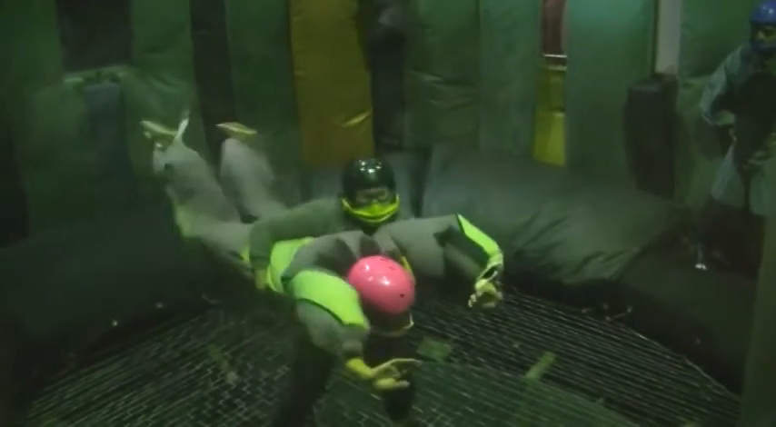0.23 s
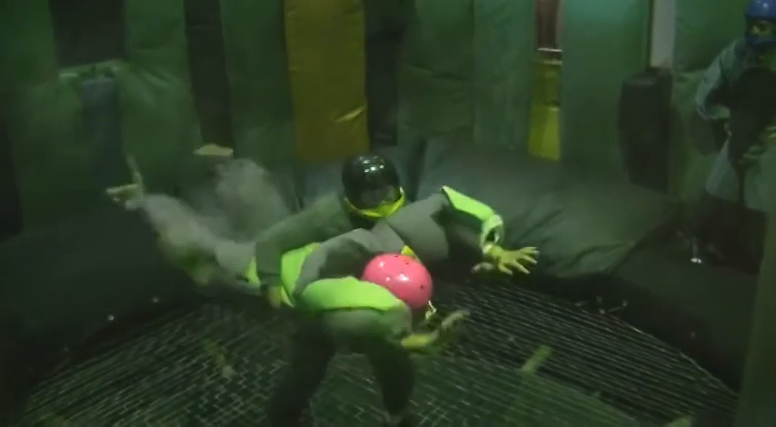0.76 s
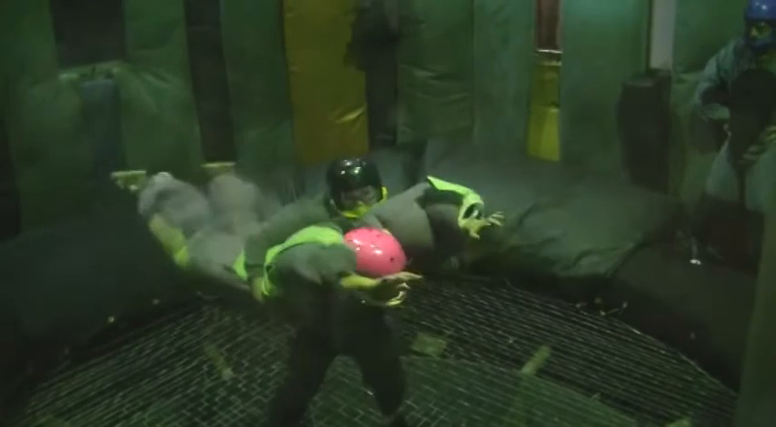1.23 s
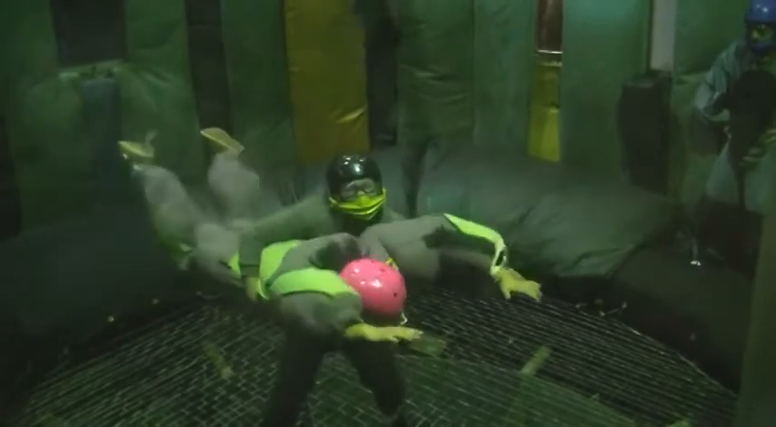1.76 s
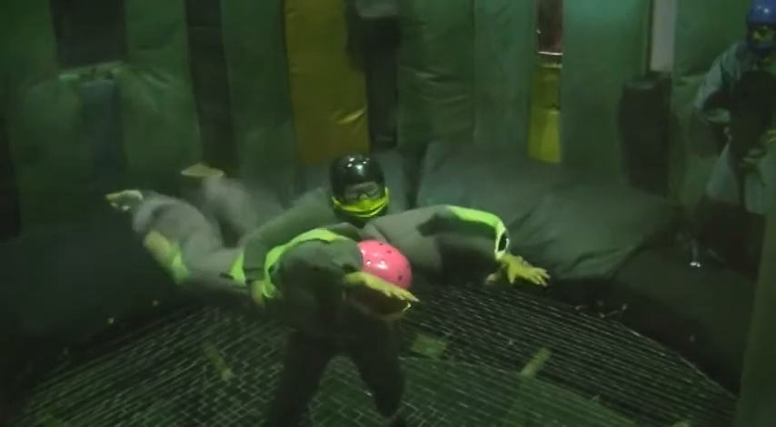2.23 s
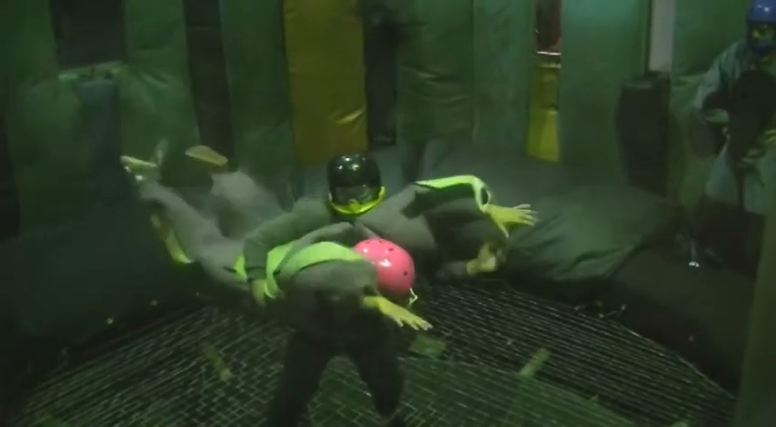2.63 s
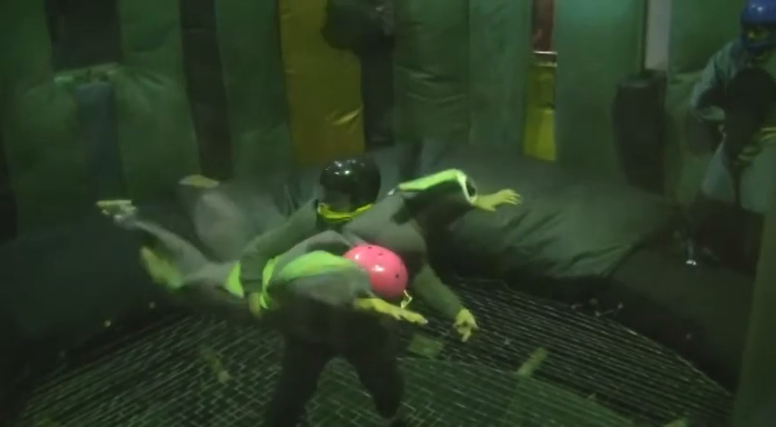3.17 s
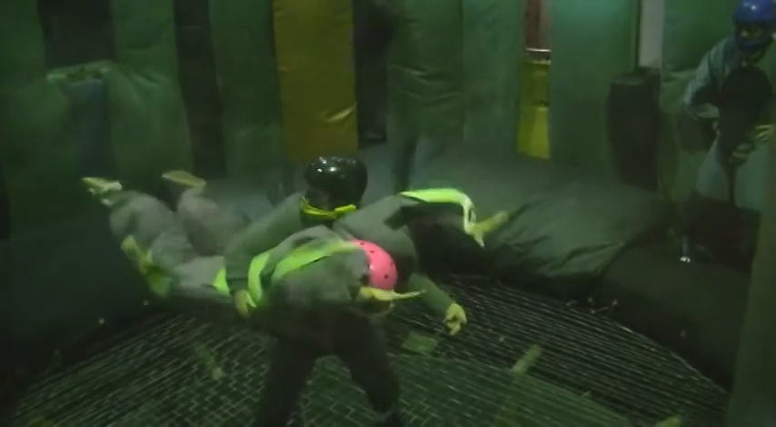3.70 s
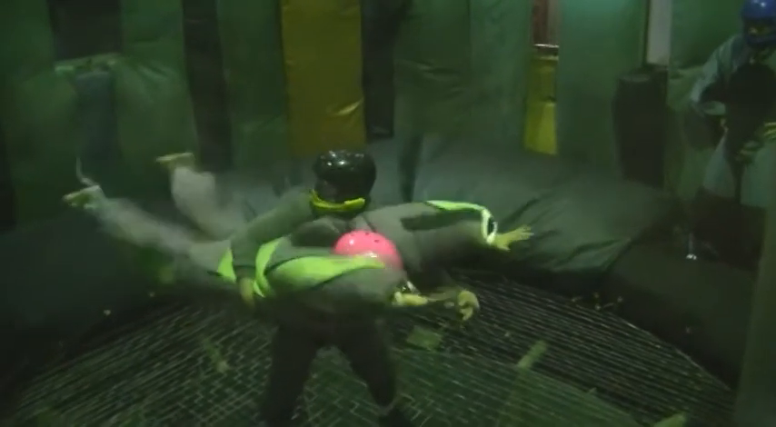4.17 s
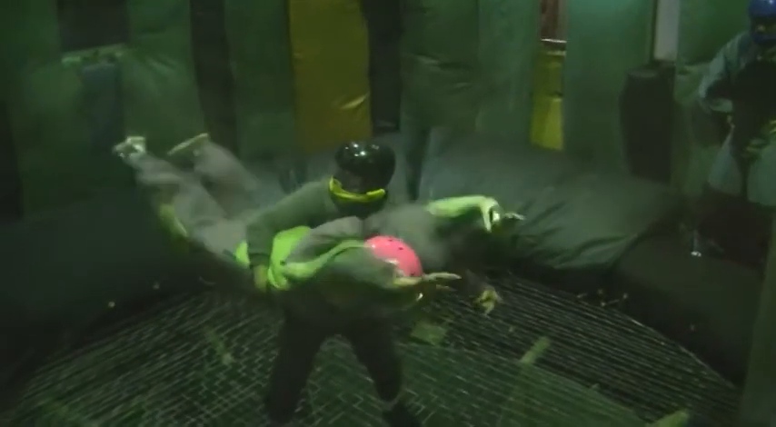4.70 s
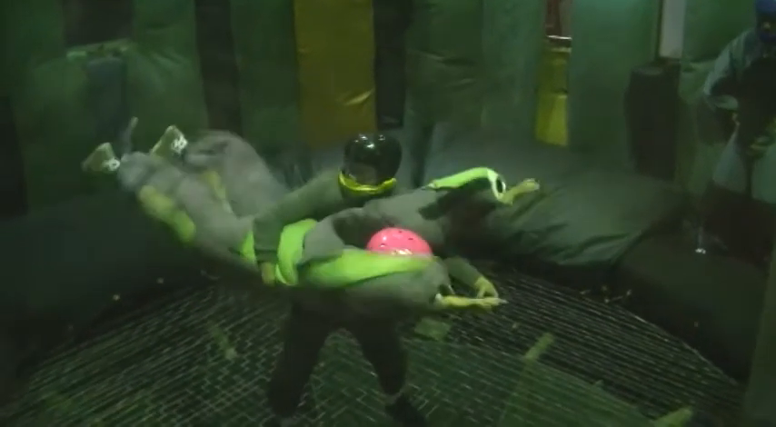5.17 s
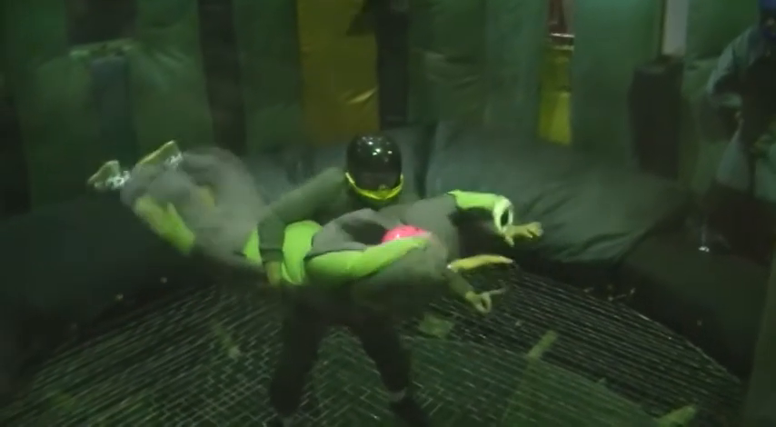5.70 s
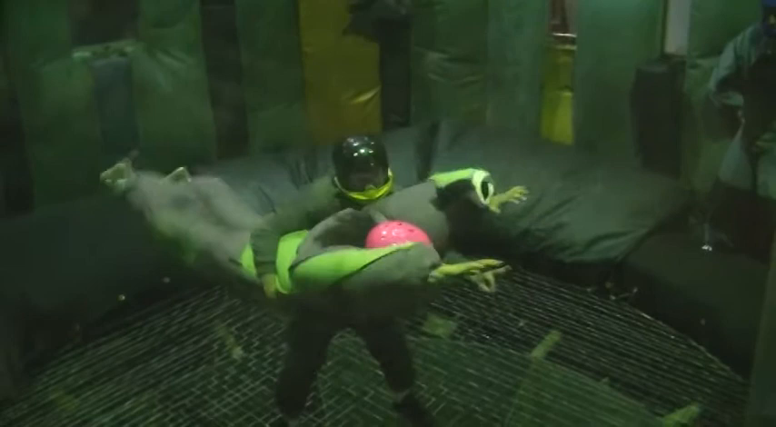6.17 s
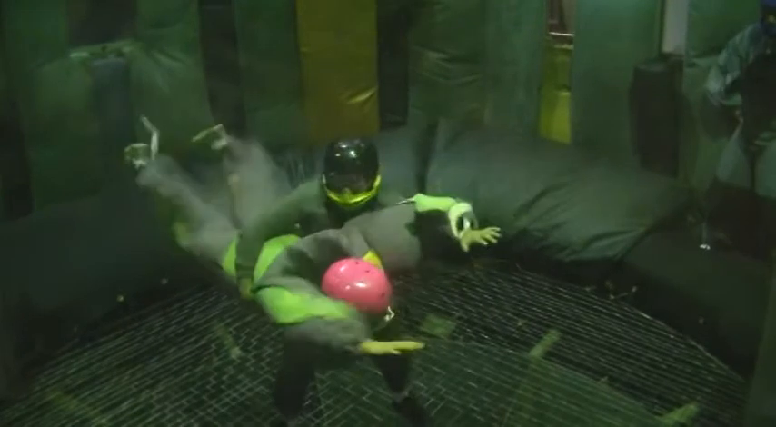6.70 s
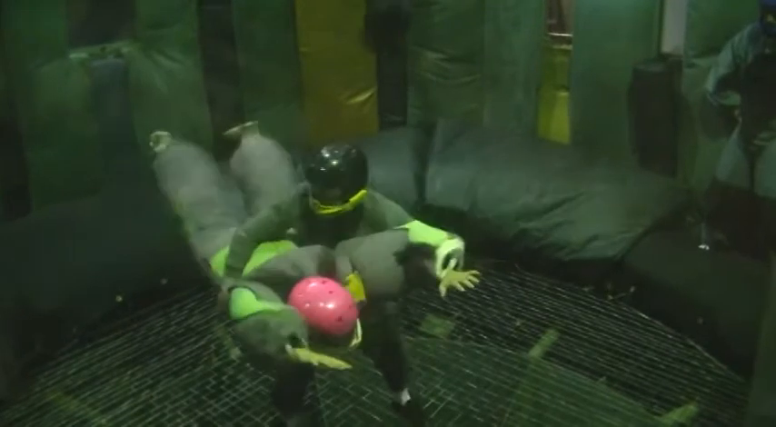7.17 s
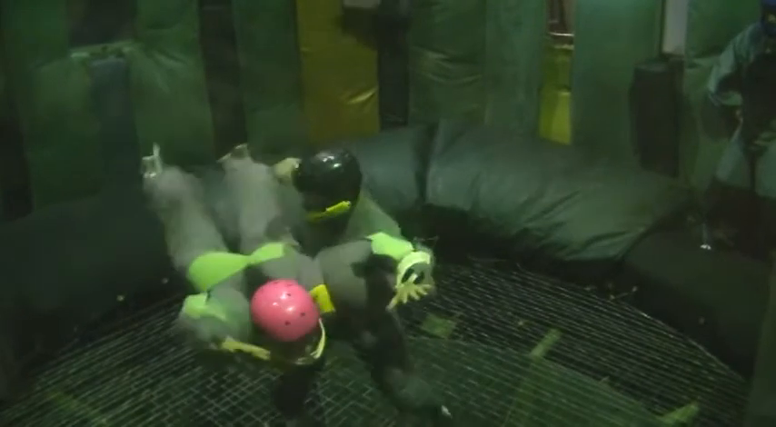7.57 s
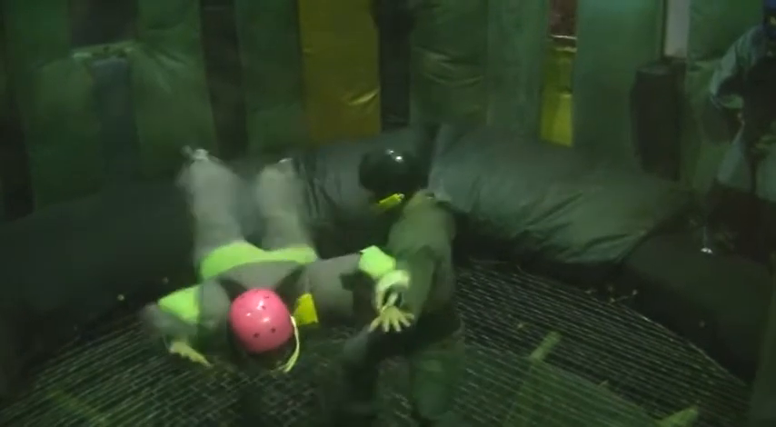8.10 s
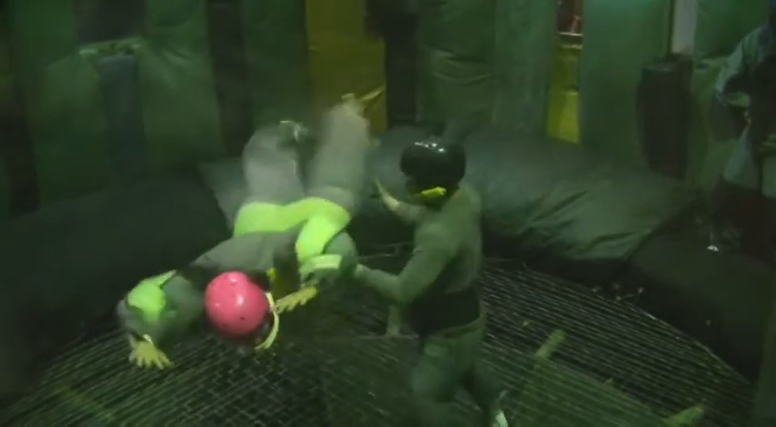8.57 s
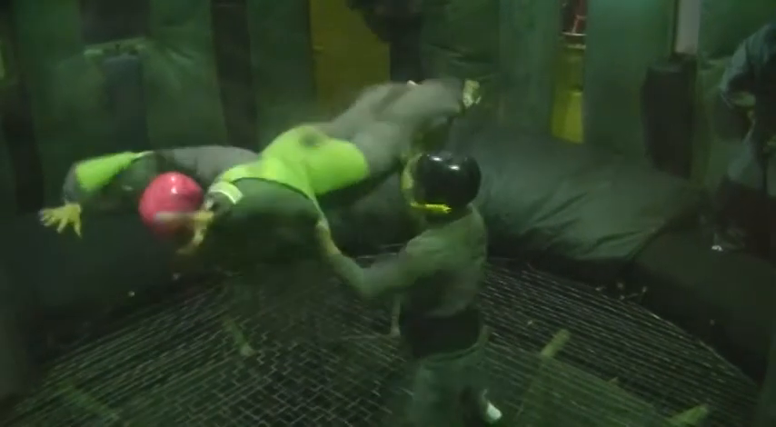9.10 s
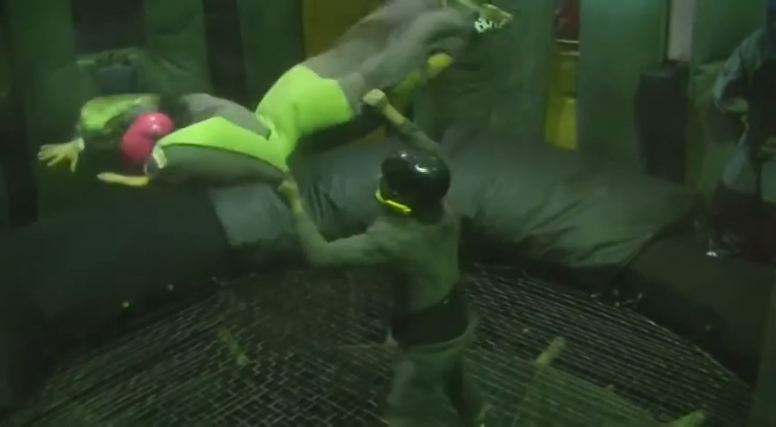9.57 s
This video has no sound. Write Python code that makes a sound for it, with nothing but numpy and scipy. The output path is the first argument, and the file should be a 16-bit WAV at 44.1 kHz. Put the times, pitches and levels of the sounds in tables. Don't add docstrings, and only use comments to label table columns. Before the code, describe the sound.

A loud low fan drone with a heavy duct roar fills a padded vertical wind tunnel, wavering constantly, with dull airy hiss on top.

```python
import sys
import numpy as np
from scipy import signal
from scipy.io import wavfile
from scipy.ndimage import uniform_filter1d

SR = 44100
rng = np.random.default_rng(int(sys.argv[2]) if len(sys.argv) > 2 else 0)


def gain_from_db(level_db):
    decades = np.asarray(level_db, float) / 20
    return 10 ** decades


def master(y):
    cut = np.clip(np.atleast_2d(y).T, -1, 1)
    pcm = np.round(cut * 32767)
    wavfile.write(sys.argv[1], SR, pcm.astype(np.int16))


N = 434385
BLADES = 3
BLADE_HZ = 44.67
CONTROL_HOP = 64


def fan():
    # (multiple of the blade rate, steady share [0-1], fading width [Hz])
    blade_tones = [
        (1, .99, 3.),
        (3, .98, 6.),
        (4, .93, 9.),
        (5, .9, 9.),
    ]
    blade_db = [-33, -22.5, -20.5, -21.5]
    # (time [s], length [s], level [dB])
    first_eddies = [
        (0.05, 0.18, -4.0),
        (0.49, 0.6, 3),
        (2.18, 0.9, 4),
        (3.34, 0.9, 2.5),
        (5.09, 0.6, -2.5),
        (6.19, 0.4, -3.5),
        (6.97, 0.6, -2.0),
        (8.52, 0.9, -2.0),
        (9.15, 0.9, -4),
        (9.77, 0.18, 3.0),
    ]
    third_eddies = [(0.11, 0.4, 3), (0.65, 0.24, 5), (1.51, 0.67, 4), (1.94, 0.22, -4), (2.23, 0.23, -17),
                    (2.56, 0.21, 2.5), (2.9, 0.26, 3.5), (3.84, 0.14, -3.5), (4.02, 0.18, -9),
                    (4.62, 0.9, 3), (5.54, 0.6, -3), (6.83, 0.26, 4), (7.11, 0.36, -4), (7.62, 0.76, 4.5),
                    (8.59, 0.4, -6.0), (8.93, 0.16, 3.0), (9.3, 0.12, -5), (9.51, 0.4, 0.5),
                    (9.58, 0.76, -4.5), (9.74, 0.18, -2.5)]
    fourth_eddies = [(0.12, 0.12, 4), (1.04, 0.14, -7.5), (1.59, 0.23, 7.0), (1.73, 0.096, -11),
                     (1.92, 0.13, -13), (2.36, 0.68, 2.5), (2.75, 0.26, -9.5), (3.52, 0.15, -13),
                     (3.95, 0.16, 3.5), (4.12, 0.18, -7.5), (4.37, 0.12, -4.5), (4.54, 0.11, 4.5),
                     (4.83, 0.46, -5), (5.38, 0.2, 8), (5.85, 0.2, 5), (6.05, 0.18, -6.5), (6.57, 0.26, 6),
                     (6.79, 0.33, -4), (7.07, 0.15, 4), (7.22, 0.18, -6), (7.6, 0.32, -5.5),
                     (8.11, 0.18, -14), (8.6, 0.12, -9.5), (8.74, 0.12, 9), (9.23, 0.52, 6),
                     (9.5, 0.12, -15)]
    fifth_eddies = [(0.8, 0.46, -8.5), (1.36, 0.4, -15.5), (1.61, 0.18, 5), (2.24, 1, 4.5),
                    (2.67, 0.12, -7.5), (3.1, 0.26, 4.5), (3.27, 0.1, -8.5), (3.4, 0.2, 10),
                    (3.53, 0.99, -10.5), (4.41, 0.22, -14), (4.6, 0.16, 5.5), (5.03, 0.26, -6),
                    (5.39, 0.12, 5.5), (5.62, 0.51, 9.0), (6.29, 0.68, -5), (6.48, 0.18, -1.5),
                    (6.7, 0.31, 0), (7.41, 0.6, -7.5), (7.49, 0.13, 8.5), (7.71, 0.23, -1.5),
                    (8.43, 1, 3.5), (8.94, 0.12, -16), (9.25, 0.26, 4), (9.43, 0.18, -7.0), (9.6, 0.13, -6),
                    (9.82, 0.091, -11)]
    # (time [s], length [s], level [dB])
    eighth_rings = [
        (3.7, .4, 3),
        (4.2, .5, 4),
        (4.9, .9, 6),
        (9.75, .3, 7),
    ]
    # (multiple of the shaft rate, level [dB], steady share [0-1], fading width [Hz])
    shaft_orders = [(1, -57, .9, 1), (2, -47, .9, 1), (4.01, -47.5, 0.5, 3.5), (4.99, -47, 0.5, 2.6),
                    (6.04, -36, 0.8, 2.2), (7.06, -34.5, 0.5, 3), (8, -48, 0.3, 2.9),
                    (10.16, -41, 0.1, 3.6), (12.44, -31.5, 0, 3), (13.77, -34, 0, 4.7),
                    (16.57, -27, 0.3, 10), (17.84, -23, 0.48, 5.6), (20.95, -24.5, .4, 5.6),
                    (19.77, -32, 0, 5), (24.12, -28.5, .3, 4.9), (25.38, -34, 0.2, 4.9),
                    (26.94, -34.5, 0.6, 5), (27.92, -37.5, .2, 6), (30.2, -37.5, 0.2, 2),
                    (33.35, -40, 0, 7.3), (36.27, -37.5, 0.1, 5)]

    blade_turns = BLADE_HZ * np.arange(N) / SR
    shaft_turns = blade_turns / BLADES
    eddies = first_eddies, third_eddies, fourth_eddies, fifth_eddies
    hum = np.zeros(N)
    for usual_db, events, (multiple, steady, width_hz) in zip(blade_db, eddies, blade_tones):
        hum += gain_from_db(usual_db + swells(events)) * tone(multiple * blade_turns, steady, width_hz)

    duct_surge = surge()
    for multiple, order_db, steady, width_hz in shaft_orders:
        order = gain_from_db(order_db) * tone(multiple * shaft_turns, steady, width_hz)
        if round(multiple) == 8 * BLADES:
            order *= gain_from_db(swells(eighth_rings))
        if multiple > 5 * BLADES:
            order *= duct_surge
        hum += order
    return hum * gain_from_db([[.3], [-.3]])


def tone(turns, steady, width_hz):
    points, settling = N // CONTROL_HOP + 400, 300
    r = np.exp(-2 * np.pi * abs(width_hz) * CONTROL_HOP / SR)
    scattered = rng.standard_normal(points) + 1j * rng.standard_normal(points)
    for _ in range(2):
        scattered = signal.lfilter([1 - r], [1, -r], scattered)
    scattered = evened(scattered[settling:])
    steady = np.clip(steady, 0, 1)
    wander = steady + np.sqrt(1 - steady ** 2) * scattered
    at, points_at = np.arange(N) / CONTROL_HOP, np.arange(len(wander))
    wander = np.interp(at, points_at, wander.real) + 1j * np.interp(at, points_at, wander.imag)
    spin = np.exp(2j * np.pi * (turns + rng.random()))
    return np.sqrt(2) * (wander * spin).real


def surge():
    # (time [s], length [s], level [dB])
    surges = [(0.2, 0.18, 1.5), (0.44, 0.58, -0.5), (0.91, 0.43, -2.0), (1.56, 0.16, -2.0), (1.96, 0.4, -4),
              (2.25, 0.3, 1.5), (2.87, 0.26, -3.5), (3.42, 0.4, -1), (3.67, 0.22, 2), (3.83, 0.9, -2.5),
              (4.27, 0.11, -2.5), (4.55, 0.44, 3.0), (4.97, 0.44, 0.5), (5.47, 0.18, -2.5), (5.73, 0.35, 4),
              (6.97, 0.9, 1.0), (7.68, 0.97, 1), (7.7, 0.12, -1.5), (8.41, 0.1, 2.5), (8.65, 0.26, 0),
              (9.24, 0.18, 1.5), (9.59, 0.087, -3.5)]
    return gain_from_db(1.36 * swells(surges))


def roar():
    # (frequency [Hz], level [dB per Hz])
    roar_colour = [(12, -48.5), (40, -29.5), (68, -25), (95, -12.5), (165, -9), (200, -2), (255, -6.5),
                   (286, -6), (325, -2.5), (400, -5.5), (540, -10), (800, -20), (1300, -38), (2000, -74.5)]
    noise = turbulence(roar_colour, size=4096, patchy_db=0.38, flicker_db=0.63)
    return gain_from_db(-19) * surge() ** 0.29 * noise


def rush():
    # (frequency [Hz], level [dB per Hz])
    rush_colour = [(530, -28), (900, -4), (1300, -6.5), (1650, -6.5), (1900, -5.5), (2500, -9), (3100, -12),
                   (4300, -16.5), (5000, -21.5), (6400, -21.5), (8000, -29.5), (11000, -39.5), (14000, -50),
                   (15700, -58.5)]
    # (time [s], length [s], level [dB])
    gusts = [(.25,.1,1.5), (.45,.1,0.5), (.62,.12,-1.5), (.82,.14,1), (1.12,.26,-1), (1.4,.18,1.5),
             (1.8,.2,-0.5), (1.93,.12,-1.5), (2.59,.4,-1), (3.53,.1,2), (3.75,.1,-1), (3.87,.1,1.5),
             (4.1,.3,.5), (4.44,.18,1), (5.24,.12,-1), (5.53,.18,1.5), (5.75,.18,0.5), (6.03,.4,-.5),
             (6.75,.45,-1), (7.15,.4,1), (7.37,.12,-1), (7.75,.18,-1.5), (8.09,.12,2), (8.31,.12,2),
             (8.58,.08,1), (8.68,.12,-1.5), (9.01,.18,1.5), (9.5,.12,0.5)]
    noise = turbulence(rush_colour, size=512, patchy_db=0.13, flicker_db=0.54)
    return gain_from_db(-38.5 + swells(gusts)) * noise


def turbulence(colour, size, patchy_db, flicker_db):
    # (frequency [Hz], likeness [0-1])
    likeness = [(60, 1), (500, 0.99), (750, .999), (960, 0.98), (1400, .96), (1800, 1), (2200, 0.99),
                (2450, .94), (3500, .95), (5500, .95), (6900, 0.94), (8000, .95), (9500, 0.94),
                (15000, 0.95)]
    # (frequency [Hz], left minus right [dB])
    balance = [(60, -2), (110, 1.5), (200, 1), (380, 0.5), (700, 0), (1290, 0), (2380, 0.5), (4400, 1),
               (8120, 0.5), (15000, 2.5)]
    hop = size // 4
    moments, hz = N // hop + 5, np.fft.rfftfreq(size, 1 / SR)
    a, b, c, d, patches = rng.standard_normal((moments, len(hz), 5)).T
    patches = uniform_filter1d(patches, size=12, axis=0)
    patches = evened(uniform_filter1d(patches, size=14, axis=1))
    flicker = evened(uniform_filter1d(rng.standard_normal(moments), size=5))

    apart = np.sqrt((1 - np.clip(read(likeness, hz), 0, 1)) / 2)[:, None]
    mid = np.sqrt(1 - apart ** 2) * (a + 1j * b)
    side = apart * (c + 1j * d)
    lean = gain_from_db(read(balance, hz) / 2)[:, None]
    spectra = np.array([(mid + side) * lean, (mid - side) / lean])
    spectra *= gain_from_db(read(colour, hz)[:, None] + patchy_db * patches + flicker_db * flicker)
    noise = signal.istft(spectra, nperseg=size, noverlap=size - hop)[1]
    return evened(noise[:, :N])


def swells(events):
    t = np.arange(0, N + CONTROL_HOP, CONTROL_HOP) / SR
    curve_db = sum(height * np.exp(-8 * ((t - time) / length) ** 2) for time, length, height in events)
    return np.interp(np.arange(N) / SR, t, curve_db)


def evened(x):
    return x / np.sqrt(np.mean(abs(x) ** 2) + 1e-20)


def read(points, hz):
    f, value = np.transpose(points)
    return np.interp(np.log(hz + 1), np.log(f + 1), value)


def scene():
    return fan() + roar() + rush()


def low_pass(x):
    return signal.sosfilt(signal.butter(12, 15710, fs=SR, output="sos"), x)


def record(dry):
    follow_s, squeeze, centre_db = 0.031, 0.66, -12.5
    r = np.exp(-1 / (follow_s * SR))
    power = uniform_filter1d((dry ** 2).mean(0), size=round(SR / BLADE_HZ))
    followed = signal.lfilter([1 - r], [1, -r], power, zi=[.03])[0]
    power_db = 10 * np.log10(followed + 1e-9)
    levelled = dry * gain_from_db(-squeeze * (power_db - centre_db))
    levelled = signal.lfilter(*signal.butter(2, 31.8, "high", fs=SR), levelled)
    levelled *= np.minimum(.35 + (N - np.arange(N)) / 90, 1)
    return low_pass(levelled)


dry = scene()
out = record(dry)
master(out)
```